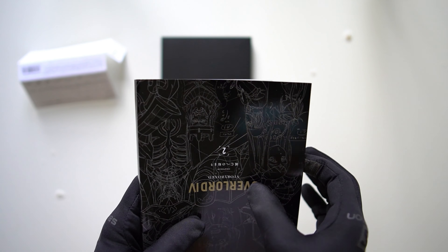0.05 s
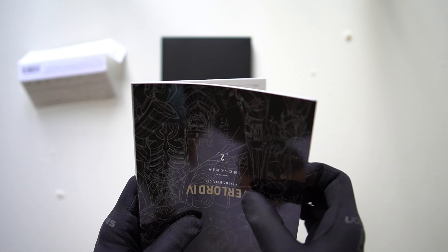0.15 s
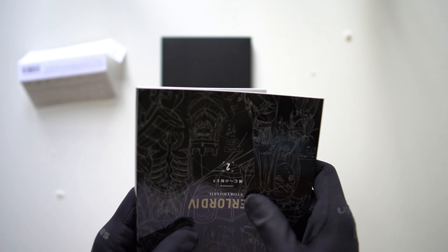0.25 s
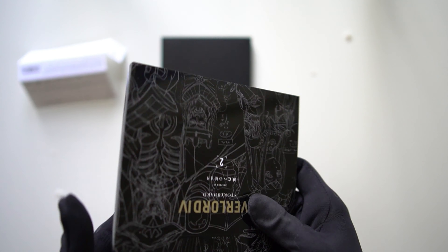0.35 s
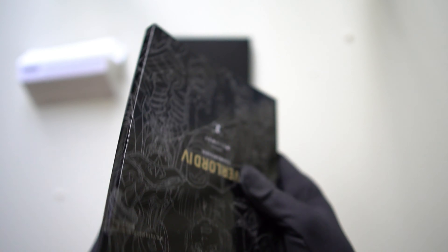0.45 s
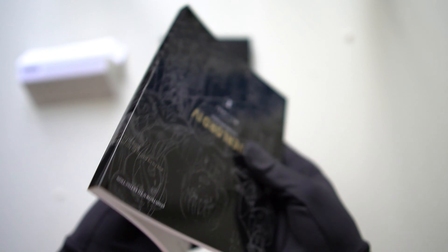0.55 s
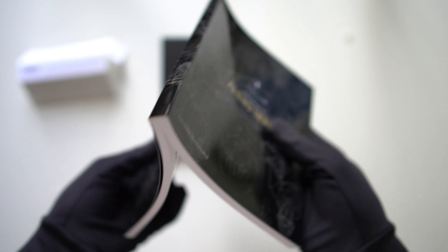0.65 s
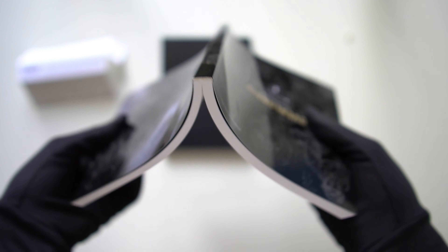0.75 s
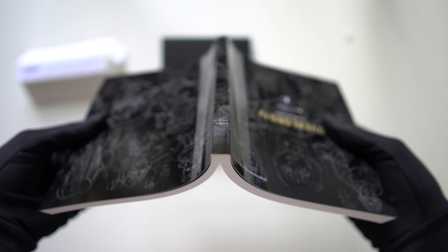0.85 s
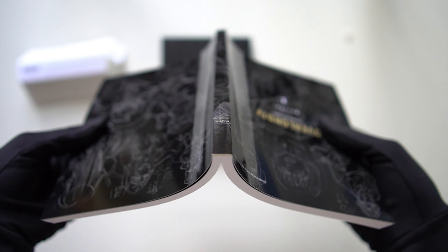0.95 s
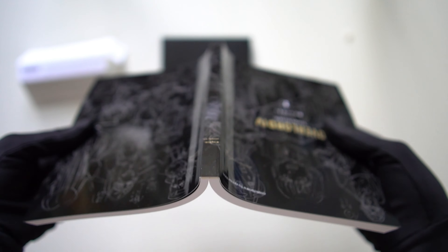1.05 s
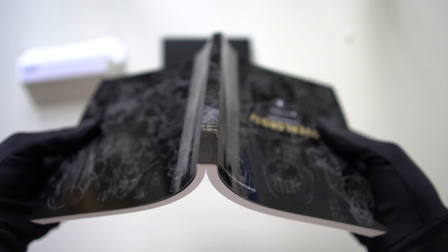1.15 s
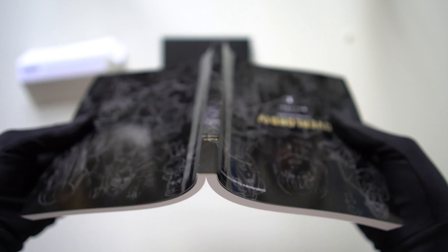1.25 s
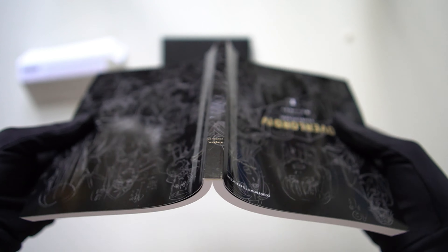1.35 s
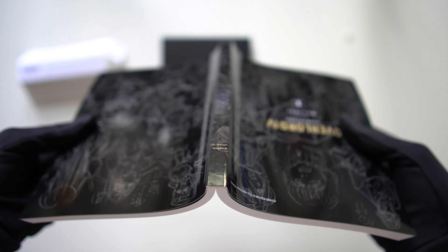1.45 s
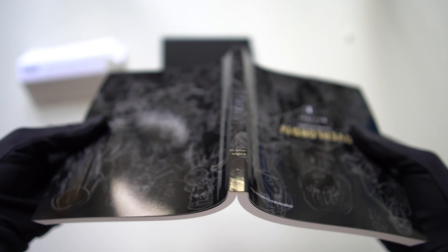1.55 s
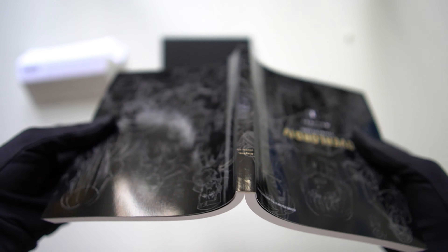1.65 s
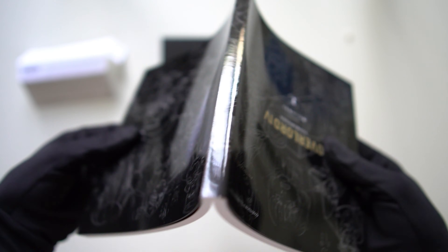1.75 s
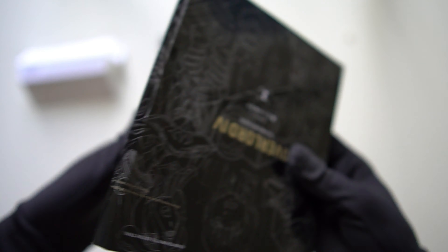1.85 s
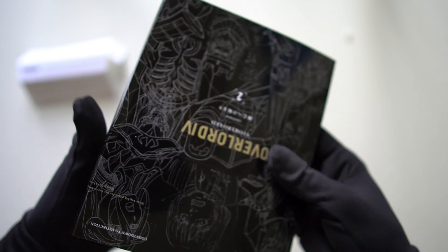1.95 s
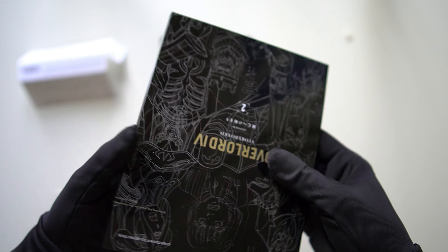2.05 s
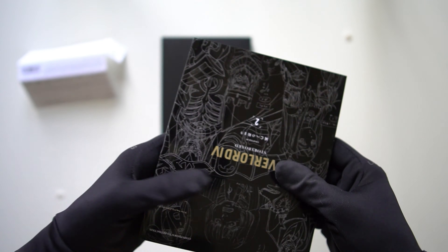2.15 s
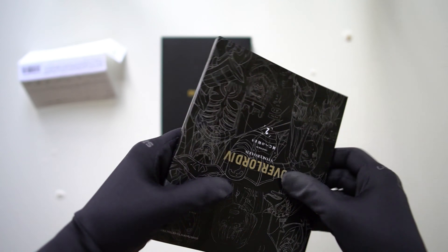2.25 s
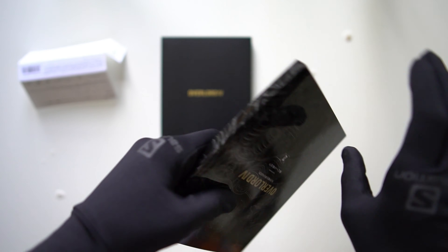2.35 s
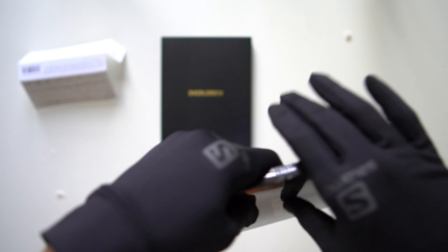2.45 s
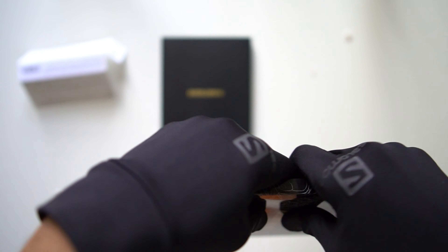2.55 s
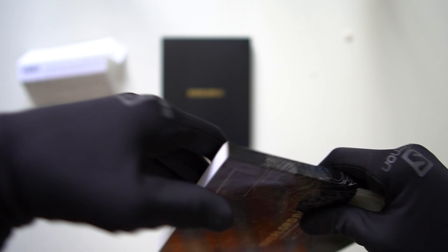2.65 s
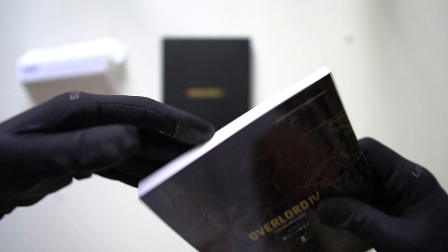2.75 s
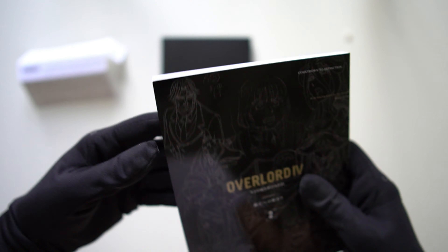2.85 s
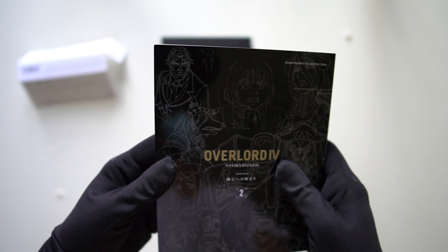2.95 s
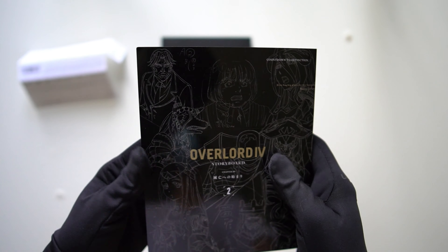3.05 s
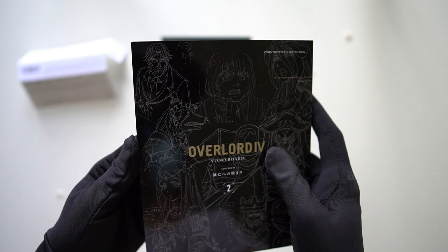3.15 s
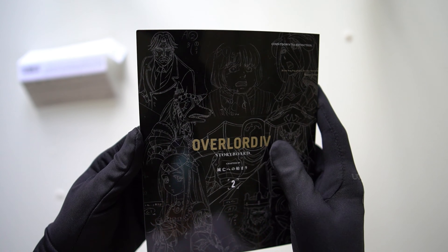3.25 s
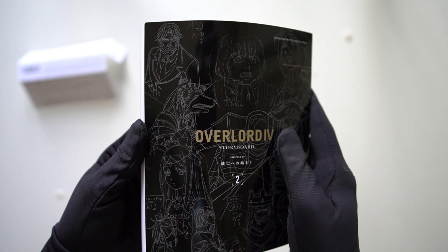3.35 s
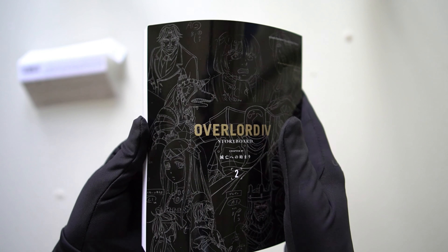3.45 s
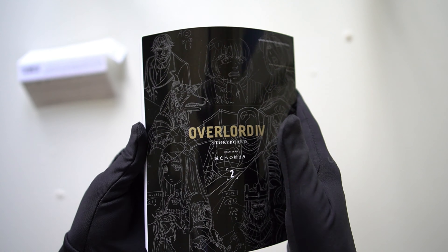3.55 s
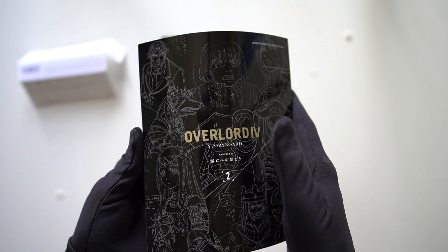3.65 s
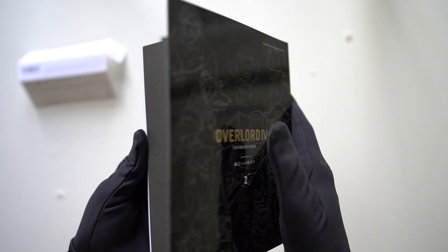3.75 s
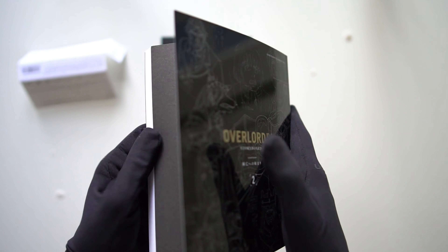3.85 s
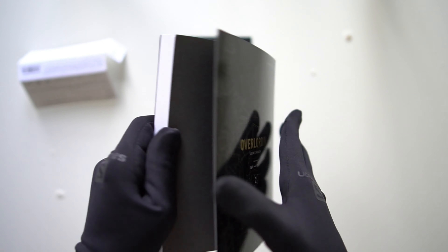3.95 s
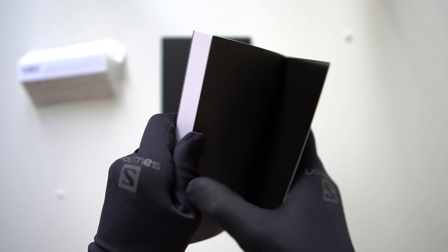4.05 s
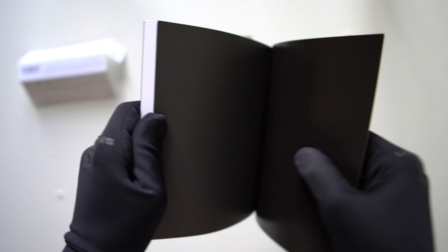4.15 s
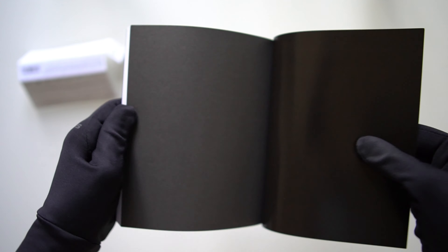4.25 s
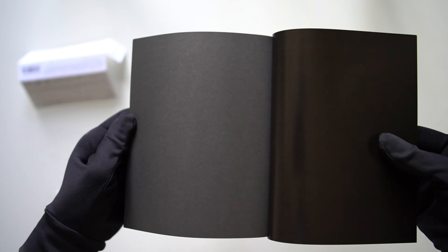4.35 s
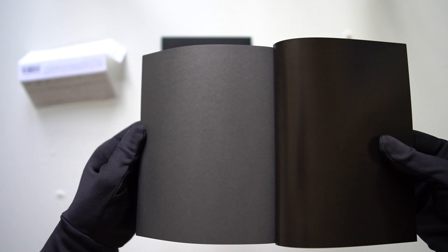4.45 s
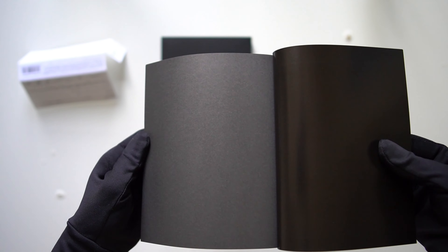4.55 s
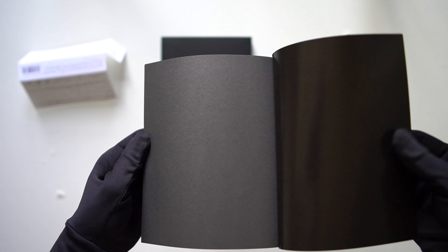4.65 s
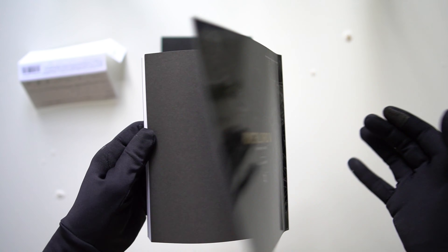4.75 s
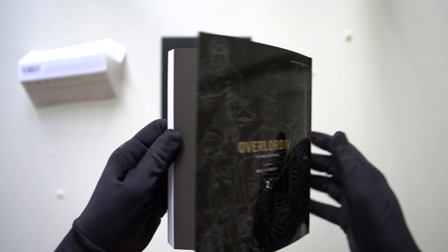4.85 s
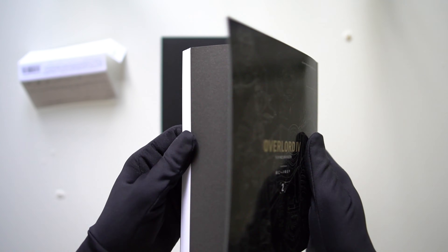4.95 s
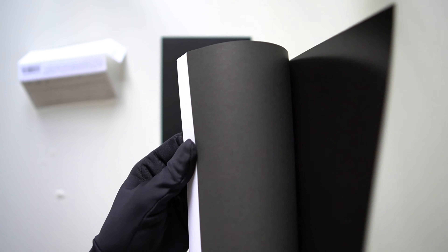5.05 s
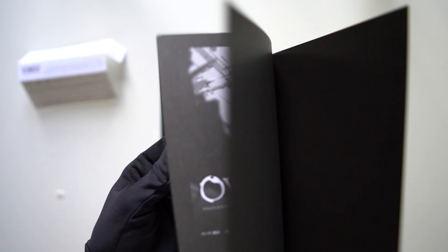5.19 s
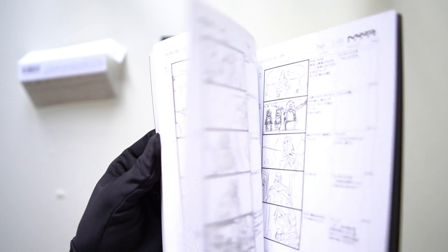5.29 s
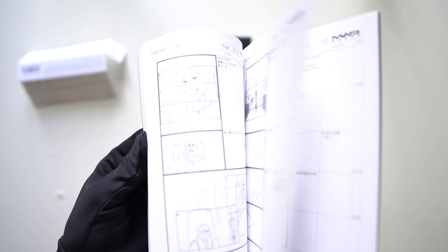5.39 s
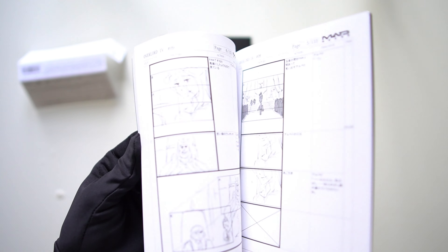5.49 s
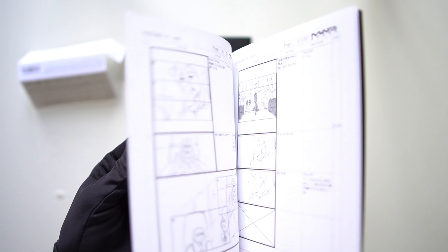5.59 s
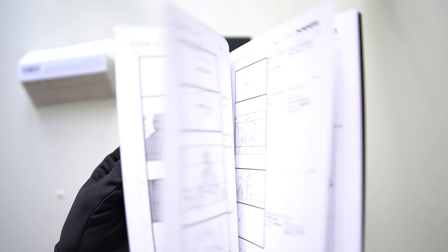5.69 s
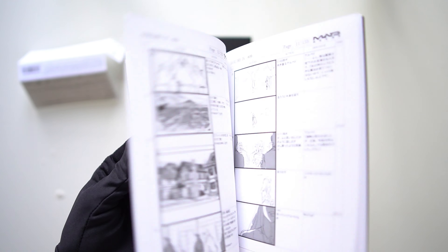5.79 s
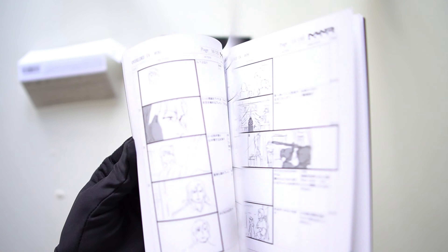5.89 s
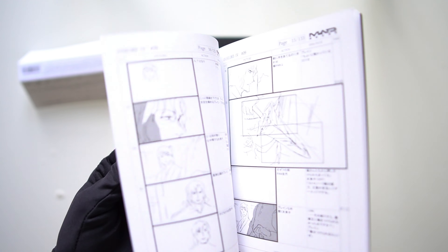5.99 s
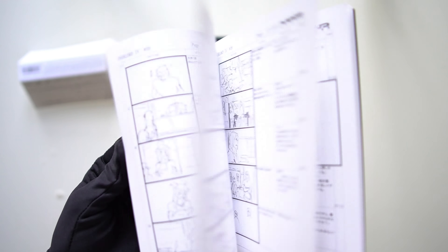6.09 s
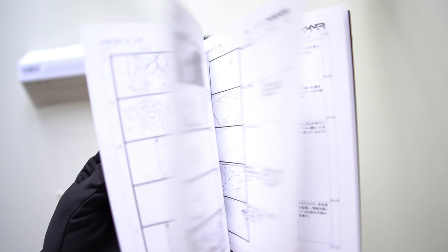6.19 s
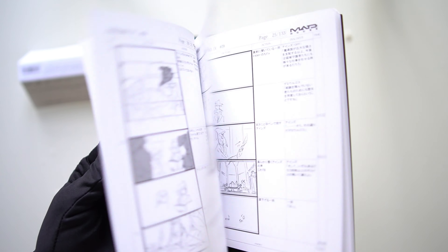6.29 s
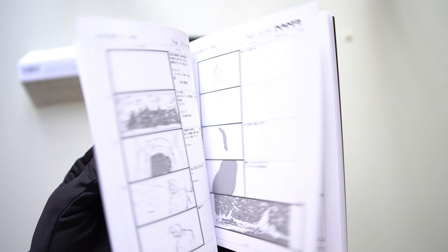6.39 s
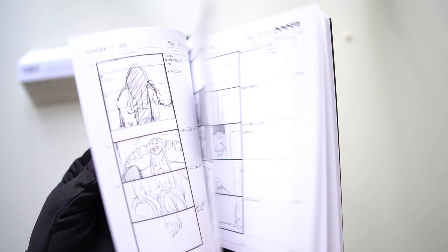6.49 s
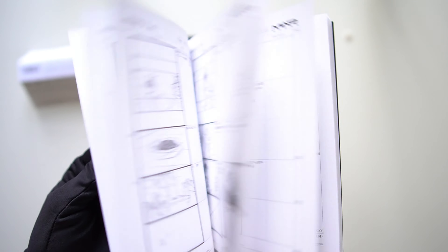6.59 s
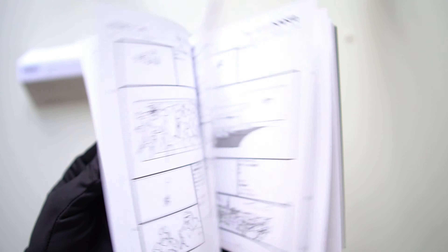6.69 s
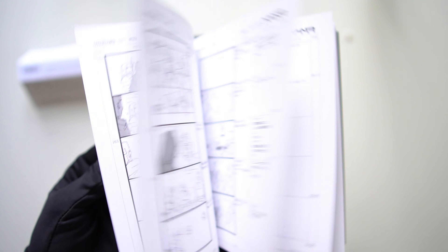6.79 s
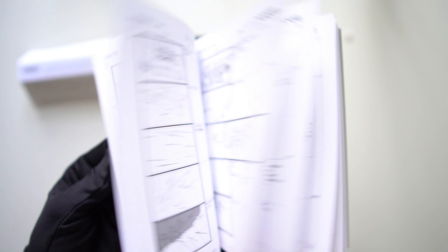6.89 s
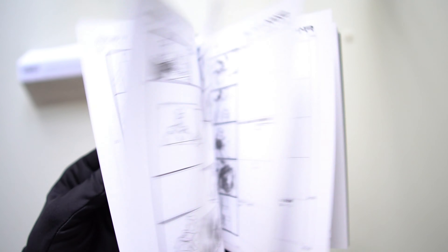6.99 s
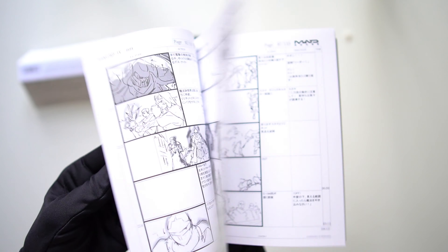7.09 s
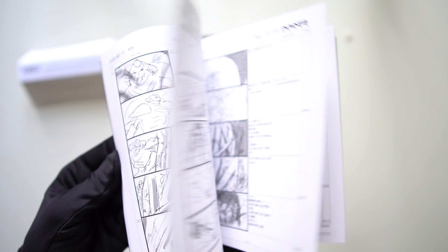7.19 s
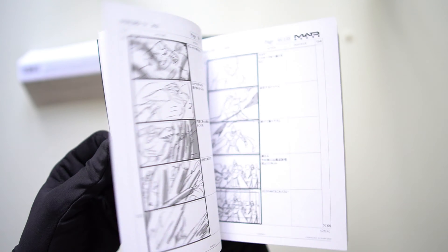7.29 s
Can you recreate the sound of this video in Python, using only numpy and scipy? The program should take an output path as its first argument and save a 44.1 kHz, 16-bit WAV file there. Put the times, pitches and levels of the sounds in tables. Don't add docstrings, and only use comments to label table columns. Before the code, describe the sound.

Very close in a quiet room with faint hum and ventilation, gloved hands rub a flexible booklet. The cover pops sharply near one second, then gives a cluster of hollow knocks and cracks around two. Light fabric rustles and small ticks follow, before a loud double pop near five seconds. Page edges then flick off the thumb one by one, speeding into a dry flutter.

```python
import sys
import numpy as np
from scipy import signal
from scipy.fft import rfft, irfft
from scipy.io import wavfile
from scipy.ndimage import uniform_filter1d

SR = 44100
rng = np.random.default_rng(int(sys.argv[2]) if len(sys.argv) > 2 else 0)


def store_wav(level_fs):
    pcm = np.round(np.clip(np.atleast_2d(level_fs), -1, 1) * 32767)
    wavfile.write(sys.argv[1], SR, pcm.T.astype(np.int16))


def ratio(d):
    e = np.asarray(d, float) / 20
    return 10 ** e


N = 323253

# start_s, pressure_db, scrape_ms, left_right_db
THUMB = [(5.0, -70.5, 3.4, 6), (5.2, -70, 3.1, -1), (5.38, -80, 3.5, 0), (5.56, -100, 4, -1.5),
         (5.72, -78, 4.2, -3), (6.12, -76, 4.6, -4), (6.5, -73.5, 7, -6.5), (6.75, -61.5, 4.4, -5),
         (6.96, -60, 7, -2.5), (7.1, -64, 6.4, -5), (7.33, -63.5, 5.9, -3.5)]


def evened(x):
    return x / np.sqrt(np.mean(x ** 2) + 1e-20)


def read(points, hz):
    f, value = np.transpose(points)
    return np.interp(np.log(hz + 1), np.log(f + 1), value)


def add(mix, s, sound):
    part = mix[..., max(round(s * SR), 0):][..., :sound.shape[-1]]
    part += sound[..., :part.shape[-1]]


def slow(hz):
    low_pass = signal.butter(2, hz, fs=SR, output="sos")
    return evened(signal.sosfilt(low_pass, rng.standard_normal(N)))


def noise(shape_db, likeness, patchy_db, size):
    frames, hz = 4 * N // size + 5, np.fft.rfftfreq(size, 1 / SR)
    a, b, c, d, patches = rng.standard_normal((frames, len(hz), 5), dtype=np.float32).T
    patches = uniform_filter1d(uniform_filter1d(patches, size=9, axis=0), size=9, axis=1)
    same = np.clip(read(likeness, hz), -1, 1)[:, None]
    left = a + 1j * b
    right = same * left + np.sqrt(1 - same ** 2) * (c + 1j * d)
    z = np.array([left, right]) * ratio(shape_db(hz)[:, None] + patchy_db * evened(patches))
    return evened(signal.istft(z, nperseg=size, noverlap=3 * size // 4)[1][:, :N])


def coloured(x, shape_db):
    hz = np.fft.rfftfreq(x.shape[-1], 1 / SR)
    return irfft(rfft(x) * ratio(shape_db(hz)), x.shape[-1])


def background():
    # freq_hz, level_db_per_hz
    vent_spectrum = [(14, -60), (37, -21), (112, -6.5), (250, -10), (520, -16), (2600, -30), (8180, -42),
                     (16000, -47.5)]
    # freq_hz, width_hz, level_db
    duct_modes = [(53.8, 3.2, 10), (174.5, 30, -5.5), (196.5, 14, 6.5), (350, 15, 5.5), (486, 79, -6),
                  (670, 40, 5.5), (903, 85, 6.5), (1250, 103, 7.5), (1650, 80, 7)]
    # freq_hz, level_db
    mains = [(100.1, -49), (200.2, -66), (300.3, -66), (400.4, -62.5)]
    # freq_hz, likeness (1 = same)
    room_likeness = [(60, 0.998), (180, 0.98), (550, 0.8), (1650, 0.46), (4970, 0.034), (15000, 0.41)]

    def shape_db(hz):
        resonances = sum(db / (1 + (2 * (hz - f) / w) ** 2) for f, w, db in duct_modes)
        return read(vent_spectrum, hz) + resonances

    t = np.arange(N) / SR
    hum = np.zeros(N)
    for hz, db in mains:
        level = np.sqrt(2) * ratio(db + 0.39 * slow(2.5))
        hum += level * np.sin(2 * np.pi * (hz * t + rng.random()))
    return ratio(-46.5) * noise(shape_db, room_likeness, patchy_db=0.0, size=4096) + hum


def sliding():
    # peak_s, rise_s, fall_s (for 20 dB), hiss_db, sheet_above_hiss_db
    glove_strokes = [(.2, .09, .1, -73, 12), (.275, .11, .045, -62, 10), (.391, .085, .05, -56.5, 12.5),
                     (.47, .06, .08, -70, 14), (.62, .12, .1, -75, 19), (.725, .11, .1, -66, 13),
                     (.765, .08, .08, -66, 10), (.91, .08, .05, -71, 14), (.99, .06, .14, -78, 21),
                     (1.825, .04, .035, -71, 15), (2.293, .06, .03, -59, 5), (2.62, .14, .11, -64, 3),
                     (2.66, .04, .03, -66, 3), (2.735, .06, .08, -67, 7.5), (2.79, .04, .03, -66, 5),
                     (2.85, .05, .1, -71, 5), (2.982, .085, .04, -65.5, 9), (3.16, .15, .2, -79, 0),
                     (3.385, .12, .13, -70, 4), (3.72, .048, .03, -76, 25), (3.918, .1, .1, -69.5, 12),
                     (4.095, .02, .12, -70, 16), (4.198, .059, .09, -60, 14), (4.355, .08, .06, -59, 9),
                     (4.5, .3, .3, -80, 20), (4.685, .04, .06, -61, 4), (4.712, .033, .018, -57.5, 11),
                     (4.74, .04, .1, -73, 17), (5.0, .18, .26, -68.5, 14)]
    # start_s, level_db
    swing = [(0, -70), (.2, -51), (.4, -61), (.52, -47), (.8, -57.5), (1.5, -52.5), (1.9, -41.5),
             (2.3, -46.5), (2.7, -58), (3.3, -60.5), (4.05, -54), (4.28, -48.5), (4.6, -53.5), (4.73, -44),
             (4.92, -54), (5.1, -51), (5.8, -51.5), (7.33, -44.5)]
    # freq_hz, level_db_per_hz
    fibre_spectrum = [(1500, -58), (4000, 0), (8000, -2), (12000, -3), (16000, -11)]
    # freq_hz, level_db_per_hz
    sheet_spectrum = [(300, -6), (1000, 6), (2500, 3), (5000, -7.5), (8000, -14), (12000, -47)]
    # freq_hz, level_db_per_hz
    air_spectrum = [(30, -28), (70, -1), (300, 4.5), (800, -5.5), (1800, -11.5), (4000, -18), (7000, -21.5),
                    (16000, -26)]
    # freq_hz, likeness (1 = same)
    hand_likeness = [(100, 0.99), (300, .99), (1000, 0.93), (3000, 0.6), (8000, 0.63), (15000, 0.48)]
    roundness = 1.25
    glove_left_db, block_db = 3.5, 12

    t, now = np.arange(0, N + 88, 88) / SR, np.arange(N) / SR
    s, press_db = np.transpose(THUMB)[:2]
    thumb = ratio(np.interp(t, s, press_db, left=-120))
    peak, rise, fall, db, sheet_db = np.transpose(glove_strokes)[..., None]
    away = np.where(t < peak, (peak - t) / abs(rise), (t - peak) / abs(fall))
    strokes = ratio(db - 20 * away ** roundness)
    glove = np.linalg.norm(strokes, axis=0)
    sides = [np.hypot(thumb, ratio(side * glove_left_db) * glove) for side in (.5, -.5)]
    fibres = np.array([np.interp(now, t, level) for level in sides])
    sheet_strokes = np.linalg.norm(ratio(sheet_db) * strokes, axis=0)
    sheet = np.interp(now, t, np.hypot(ratio(block_db) * thumb, sheet_strokes))

    grain_db = slow(77)
    hiss = fibres * ratio(12.0 + 0.47 * grain_db)
    hiss = hiss * noise(lambda hz: read(fibre_spectrum, hz), hand_likeness, patchy_db=2.0, size=256)
    rustle = sheet * ratio(4.5 + .8 * grain_db)
    rustle = rustle * noise(lambda hz: read(sheet_spectrum, hz), hand_likeness, patchy_db=1.8, size=256)
    air = ratio(np.interp(now, *np.transpose(swing)) + 1.6 * slow(23.5))
    air = air * noise(lambda hz: read(air_spectrum, hz), hand_likeness, patchy_db=-1.8, size=1024)
    return hiss + rustle + air


def burst(db, ms, rise, fall, blunt, snap, shape_db, chance):
    u = (np.arange(chance.shape[1]) - 512) / SR / (ms / 1000)
    shape = np.exp(-abs(u / np.where(u < 0, rise, fall)) ** blunt)
    pair = np.array([chance[0], 0.71 * chance[0] + 0.52 * chance[1]]) - snap * (u == 0)
    pair[1] = np.roll(pair[1], 1)
    sound = shape * coloured(pair, shape_db)
    return ratio(db) * sound / abs(sound).max()


def catches():
    # start_s, level_db, pitch_hz, length_ms
    seam_catches = [(.912, -41.5, 5000, 12), (1.822, -35, 2600, 12), (2.635, -45, 6300, 15),
                    (2.712, -43, 3400, 13), (2.7207, -41, 4370, 25), (2.737, -42, 4770, 20),
                    (2.792, -42, 5200, 10), (2.846, -44, 6500, 8), (4.218, -39, 6000, 18),
                    (4.678, -37, 7800, 27), (4.983, -40, 11000, 3.2), (.375, -37, 1150, 40),
                    (.17, -41, 950, 40), (.47, -40, 1200, 40), (3.705, -36, 1000, 10),
                    (6.44, -37, 1000, 15)]
    out = np.zeros((2, N))
    for s, db, hz, ms in seam_catches:
        strip = lambda f: np.maximum(-40. * np.log2((f + 30) / hz) ** 2, -30.)
        chance = rng.standard_normal((2, 1536))
        add(out, s - .0116, burst(db, ms, .15, 0.3, 1.2, .5, strip, chance))
    return out


def room(x):
    # freq_hz, side_under_mid_db
    echo_width = [(200, -28), (500, -14), (1200, -9), (2500, -4), (5000, -2), (12000, -4)]
    # freq_hz, t60_s
    decay_times = [(200, 0.26), (600, 0.26), (1500, 0.28), (4000, 0.14), (10000, 0.051)]
    taps = rng.choice([-1., 1.], (2, SR // 2)) * (rng.random((2, SR // 2)) < .08)
    hz, t, z = signal.stft(taps, SR, nperseg=256)
    side = z[1] * ratio(read(echo_width, hz))[:, None]
    z = np.array([z[0] + side, z[0] - side])
    decay = ratio(-60 * t / read(decay_times, hz)[:, None])
    tail = signal.istft(z * decay, SR, nperseg=256)[1]
    tail = tail * np.clip(np.arange(tail.shape[1]) / (.014 * SR), 0, 1) ** 2
    return signal.fftconvolve(x[None], tail / np.linalg.norm(tail[0]), axes=1)[:, :N]


def wide(sound, side):
    # freq_hz, side_under_mid_db
    card_width = [(200, -28), (500, -16), (1200, -19), (2500, -12), (5000, -4)]
    delayed = np.roll(coloured(sound, lambda f: read(card_width, f)), round(.0012 * SR))
    far = np.sign(side) * delayed
    return np.array([sound + far, sound - far])


def buckle(db, hz, ms, body_db, chance):
    # freq_hz, width_hz, level_db
    cover_modes = [(348, 99, 5), (648, 93, -0.5), (827, 99, 2), (1200, 36, -6), (1703, 67, -9),
                   (2300, 170, -9), (2850, 260, -18) ]
    # freq_hz, level_db_per_hz
    thud_spectrum = [(60, -6.5), (150, 1), (400, -2), (800, -2.5), (1300, 0.5), (3000, -17.5), (5000, -52)]
    t = np.arange(2000) / SR
    modes = np.zeros(2000)
    bend = 1 + 0.014 * chance[2]
    for (f, w, g), b in zip(cover_modes, bend):
        modes += ratio(g) * np.exp(-np.pi * w * t) * np.sin(2 * np.pi * f * b * t)
    u = np.arange(1024) / SR / (ms / 1000)
    front = u ** 1.2 * np.exp(-2.2 * u ** 3)
    turn = 2 * np.pi * np.cumsum(hz * 2 ** (0.4 * (np.minimum(u, 1) - .55))) / SR
    wave = front * (np.sin(turn) + 0.017 * np.sin(2 * turn))
    near = lambda f: -6. * np.log2((f + 30) / hz) ** 2
    ring = signal.fftconvolve(front * coloured(chance[0], near), modes)
    thud = u * np.exp(-u / 0.39) * coloured(chance[1], lambda f: read(thud_spectrum, f))
    sound = 0.5 * ring / abs(ring).max()
    add(sound, 0, 0.62 * wave / abs(wave).max() + ratio(body_db) * thud / abs(thud).max())
    return ratio(db) * sound / abs(sound).max()


def knock(db, hz, ms):
    t = np.arange(2000) / SR
    onset = (1 - np.exp(-4. * hz * t)) ** 2
    return -ratio(db) * np.sin(2 * np.pi * hz * t) * np.exp(-t * 1000 / ms) * onset


def pops():
    # start_s, level_db, pitch_hz, length_ms, body_db
    buckles = [(.801, -22, 766, 5.5, -18), (1.0962, -10, 1640, 10, -6), (1.0975, -16, 820, 8, 3),
               (1.894, -20.5, 780, 3.5, -3), (1.909, -25, 900, 3.7, -4.5), (1.932, -16, 744, 8, -3),
               (2.002, -18.5, 715, 7.2, 2.5), (2.231, -27.5, 724, 6, -4), (4.938, -10.5, 804, 5, -6),
               (4.9405, -5, 1513, 7.2, -13), (4.953, -13, 1250, 6.8, -10), (4.998, -19, 1454, 10, 4),
               (5.005, -21, 842, 14.8, -10)]
    # start_s, level_db, pitch_hz, length_ms, body_db
    further_buckles = [(0.244, -31, 935, 17, 0), (2.117, -34, 643, 9, 5.5), (2.291, -34, 1800, 8, -14),
                       (2.567, -29.5, 635, 3.7, 10), (4.107, -35.5, 1650, 6.8, -12), (4.133, -28, 600, 12, 8),
                       (4.194, -29, 1650, 8.1, -3), (4.71, -37, 1510, 6.9, -14), (6.748, -32, 1230, 4.3, 4),
                       (6.781, -36, 845, 6, -16), (6.833, -27, 700, 6.5, -3), (6.965, -22.5, 806, 4.5, -16),
                       (6.998, -25, 896, 5, -18), (7.066, -25, 850, 4.6, -17), (7.083, -33, 900, 4.6, -6),
                       (7.113, -24.5, 855, 5, -8), (7.11, -28.5, 1590, 9.4, 2), (7.125, -31, 2210, 3.3, -13),
                       (1.099, -22, 2300, 1.8, -4), (.958, -37, 1820, 3.9, -23), (5.003, -31, 2310, 3.4, -19),
                       (5.035, -26, 817, 14, -11)]
    # start_s, level_db, pitch_hz, ring_ms
    knocks = [(1.0975, -21, 240, 5.1), (1.0965, -24, 1300, 2.5), (1.9018, -9, 946, 2.15),
              (1.9022, -18, 2270, 1.2), (1.9108, -36, 2310, 0.7), (1.9315, -24, 1400, 2.2),
              (2.0015, -22, 2040, 1.1), (2.0025, -18, 833, 2.9), (2.0045, -30, 398, 4.5),
              (2.0128, -16.5, 2280, 0.91), (2.2247, -12.5, 2480, 0.6), (2.2252, -21, 1660, 1),
              (2.2995, -30, 1740, 1.5), (2.292, -35, 1500, 4), (2.3275, -21, 740, 2.5),
              (4.928, -12, 1250, 1.8), (4.9281, -21, 2750, 0.9), (4.939, -13.5, 380, 4.3),
              (4.9435, -28, 2860, 1.2), (4.997, -22, 333, 11.4), (1.099, -18, 432, 10),
              (1.954, -28, 698, 13), (2.0065, -25, 313, 4.5), (2.011, -22, 940, 6),
              (2.228, -25.5, 252, 7.9), (2.327, -22, 300, 3.5), (2.334, -29, 740, 6.4),
              (4.929, -26, 200, 5), (4.95, -23, 280, 5.5), (4.971, -26, 300, 6), (1.123, -30, 830, 8),
              (4.931, -27, 650, 5), (2.119, -33, 620, 9), (1.904, -27.5, 300, 6), (6.979, -35, 750, 2.7),
              (2.227, -31, 1200, 3), (6.7275, -31, 1510, 2), (6.7, -32, 800, 4.5), (7.179, -31.5, 860, 6.7),
              (4.1, -38, 695, 4)]
    room_share_db, share_db_per_octave = -13.5, -3.5
    sent, direct = np.zeros((2, N)), np.zeros((2, N))
    for k, (s, db, hz, ms, body_db) in enumerate(list(buckles) + list(further_buckles)):
        chance = rng.standard_normal((3, 1024))
        sound = buckle(db, hz, ms, body_db, chance)
        add(direct, s, wide(sound, chance[2, -1]))
        add(sent[k % 2], s, ratio(room_share_db + share_db_per_octave * np.log2(hz / 1000)) * sound)
    for k, (s, db, hz, ms) in enumerate(knocks):
        sound = knock(db, hz, ms)
        add(direct, s, wide(sound, (-1) ** k))
        octaves = max(np.log2(hz / 1000), 0)
        add(sent[k % 2], s, ratio(room_share_db + share_db_per_octave * octaves) * sound)
    return direct + room(sent[0]) + room(sent[1])


def creases():
    # start_s, level_db, pitch_hz, length_ms, snap_strength
    ticks = [(.2525, -28.5, 3504, 3.7, 2), (0.967, -36, 5400, 4.2, 1.3), (2.0, -26, 3600, 8.4, 2.6),
             (2.182, -41, 2200, 2, 3), (2.2244, -19, 3380, 5.4, 9), (2.276, -27, 8500, 2.7, 1.8),
             (2.3, -24, 1900, 4, 1.5), (2.4, -33.5, 2970, 3, 2.9), (2.449, -40, 3510, 1.5, 3),
             (2.5, -30.5, 5430, 2.6, 1.6), (2.78, -33, 7160, 3, 1.8), (3.2006, -34, 6000, 2.3, 2),
             (3.705, -25, 4330, 9.2, 4.3), (4.178, -32, 3000, 2, 3), (4.1965, -24.5, 3500, 3, 3),
             (4.711, -28, 4500, 3.3, 1.2), (4.927, -19, 10800, 2.2, 4.5), (4.9922, -31, 9000, 2.8, 1.5)]
    out = np.zeros((2, N))
    for s, db, hz, ms, snap in ticks:
        skirt = lambda f: np.where(f > hz, -19., -40.)
        crease = lambda f: np.maximum(-9. * np.log2((f + 30) / hz) ** 2, skirt(f))
        chance = rng.standard_normal((2, 1536))
        add(out, s - .0112, burst(db, ms, 0.026, 0.25, 0.72, snap, crease, chance))
    return out + ratio(-13.5) * room(out.mean(0))


def page_edges():
    # start_s, level_db, pitch_hz
    flicks = [(5.151, -24, 5380), (5.196, -25.5, 4820), (5.2655, -24, 4440), (5.3247, -34, 3720),
              (5.3407, -22.5, 3850), (5.5933, -24.5, 3900), (5.678, -26, 3720), (5.7118, -26, 4960),
              (5.7965, -25.5, 3900), (5.8303, -34.5, 6200), (5.8578, -22, 4530), (5.985, -35, 8200),
              (6.0153, -20.5, 5300), (6.055, -33, 6250), (6.0705, -23, 6140), (6.128, -29, 7940),
              (6.136, -23.5, 5250), (6.174, -35, 4950), (6.179, -24, 6050), (6.2119, -24, 4260),
              (6.265, -21, 9200), (6.3013, -24.5, 4500), (6.328, -24.5, 4500), (6.398, -25.5, 8350),
              (6.4257, -23, 8950), (6.466, -25.5, 5350), (6.52, -30, 7350), (6.559, -25, 4950),
              (6.569, -28, 4500)]
    # start_s, level_db, pitch_hz
    quick_run = [(6.599, -23.5, 3970), (6.605, -25, 5610), (6.621, -25, 5110), (6.634, -23.5, 4770),
                 (6.648, -22.5, 3880), (6.672, -25, 5120), (6.696, -30, 7500), (6.701, -23.5, 5100),
                 (6.724, -27, 8200), (6.7288, -21.5, 5440), (6.749, -23, 6000), (6.756, -20, 4300),
                 (6.7834, -25, 5260), (6.791, -23, 4140), (6.802, -34, 8000), (6.815, -23, 5010),
                 (6.833, -20.5, 4060), (6.852, -23.5, 6670), (6.867, -22, 5610), (6.895, -25.5, 4050),
                 (6.9052, -23, 5740), (6.93, -26, 5220), (6.951, -26, 4200), (6.974, -23.5, 5170),
                 (6.9898, -22, 5660), (7.0003, -21, 5340), (7.012, -19.5, 4870), (7.0547, -28, 4660),
                 (7.064, -26, 4200), (7.073, -19.5, 4260), (7.1117, -31, 4240), (7.122, -21.5, 4400),
                 (7.1716, -21, 5300), (7.3028, -27.5, 4240)]
    # freq_hz, level_db_per_hz
    edge_spectrum = [(300, -23), (1500, 0.5), (2500, 0.5), (3500, 0.5), (8000, 0), (12000, -7),
                     (16000, -14)]
    out = np.zeros((2, N))
    at, _, scrape_ms, side_db = np.transpose(THUMB)
    for s, db, hz in list(flicks) + list(quick_run):
        chance = rng.standard_normal((2, 1536))
        ms = np.interp(s, at, scrape_ms) * ratio(chance[0, 0])
        pan_db = np.interp(s, at, side_db) + 1.4 * chance[1, 0]
        pan = ratio(np.array([[pan_db], [-pan_db]]) / 2)
        edge = lambda f: read(edge_spectrum, f) + 8.6 / (1 + ((f - hz) / (0.14 * hz)) ** 2)
        add(out, s - .0099, pan * burst(db, ms, 0.7, 0.39, 1.28, 4.3, edge, chance))
    return out + ratio(-13.5) * room(out.mean(0))


def gusts():
    # peak_s, level_db, length_s
    draughts = [
        (4.21, -75, .05),
        (4.755, -41.5, 0.032),
        (6.75, -53, 0.065),
        (7.005, -50, 0.09),
        (7.143, -51, .05),
    ]
    t = np.arange(N) / SR
    band = signal.butter(2, [38, 75], "bandpass", fs=SR, output="sos")
    lumps = evened(signal.sosfilt(band, rng.standard_normal(N)))
    return lumps * sum(ratio(db) * np.exp(-((t - s) / length) ** 2) for s, db, length in draughts)


def scene():
    return background() + sliding() + catches() + pops() + creases() + page_edges() + gusts()


def band_limit(x):
    return signal.sosfilt(signal.butter(12, 16830, fs=SR, output="sos"), x)


def record(dry):
    edge = signal.firwin(801, 15870, window=("kaiser", 7), fs=SR)
    mix = signal.oaconvolve(dry, edge[None], "same")
    return band_limit(mix)


dry = scene()
out = record(dry)
store_wav(out)
```